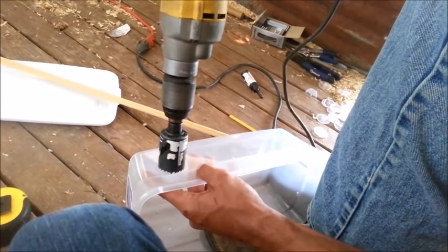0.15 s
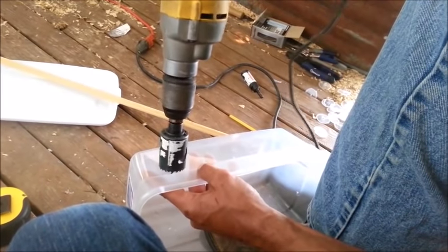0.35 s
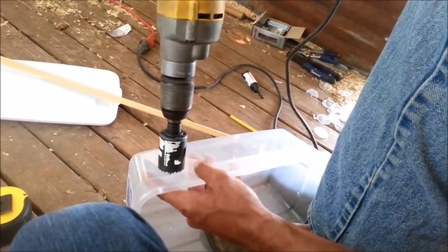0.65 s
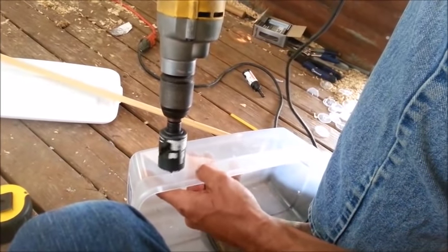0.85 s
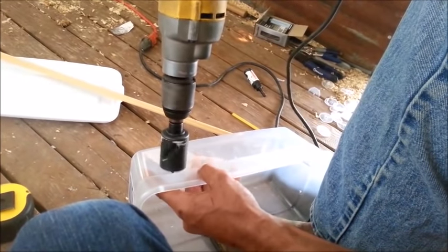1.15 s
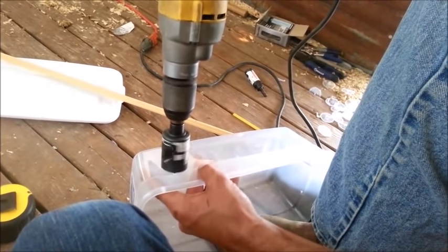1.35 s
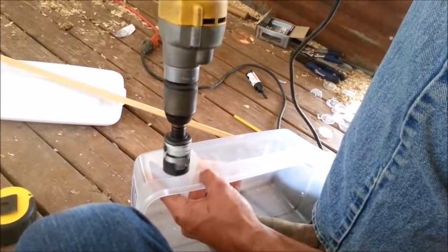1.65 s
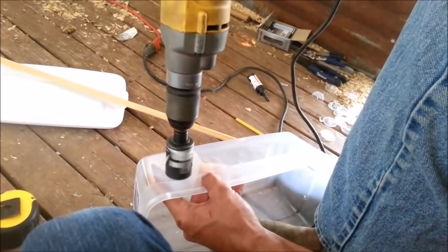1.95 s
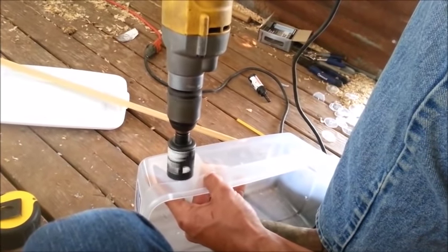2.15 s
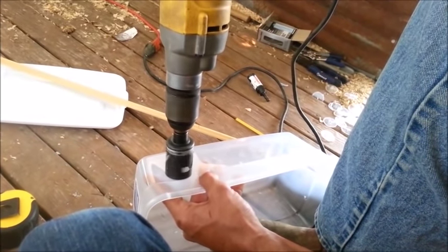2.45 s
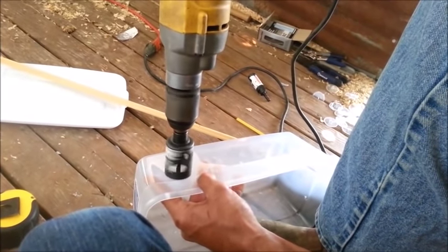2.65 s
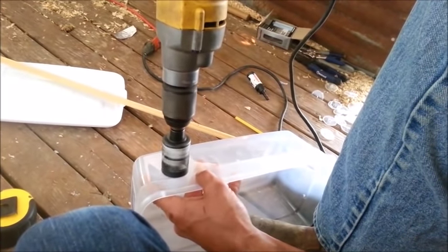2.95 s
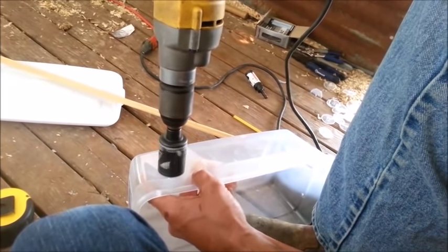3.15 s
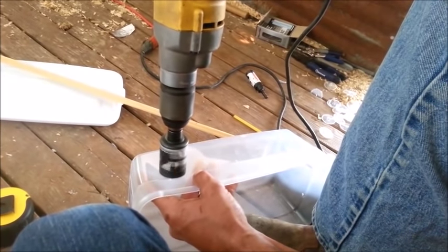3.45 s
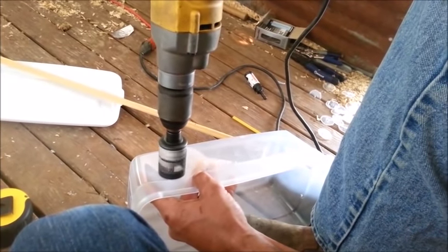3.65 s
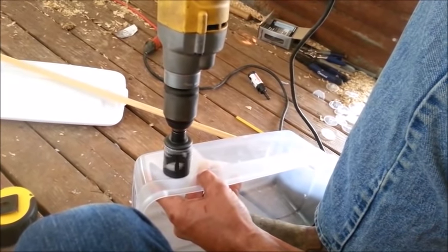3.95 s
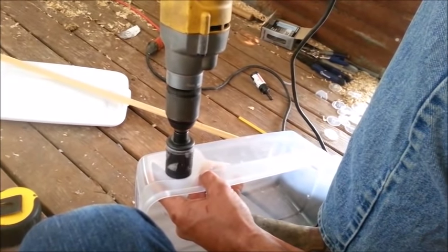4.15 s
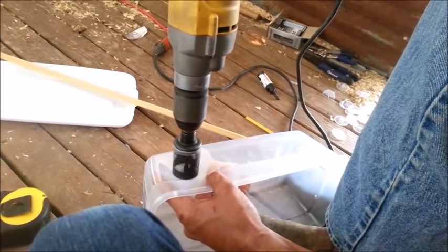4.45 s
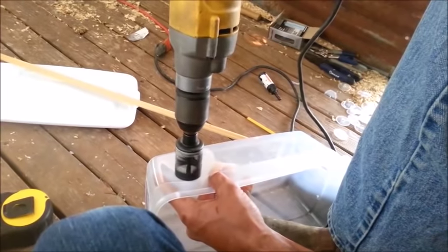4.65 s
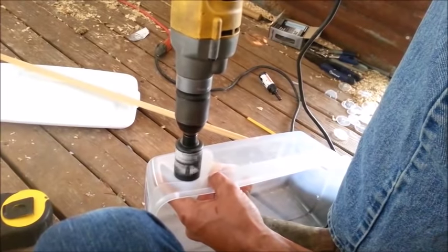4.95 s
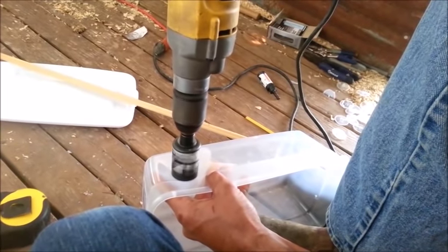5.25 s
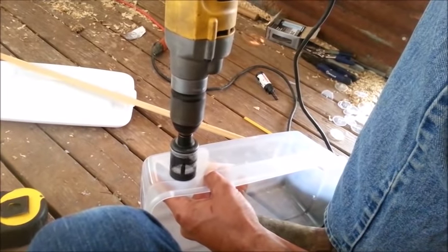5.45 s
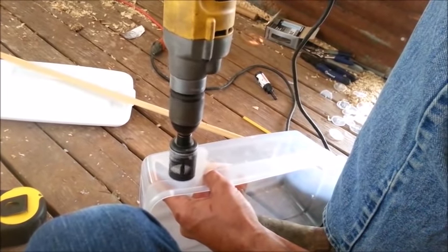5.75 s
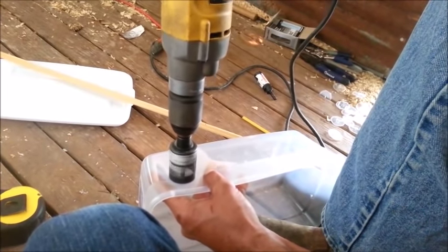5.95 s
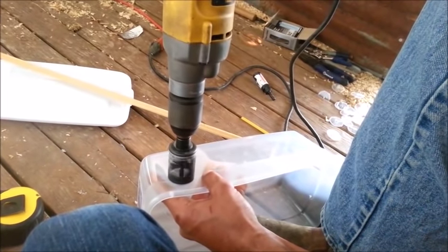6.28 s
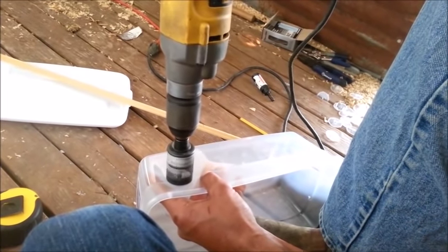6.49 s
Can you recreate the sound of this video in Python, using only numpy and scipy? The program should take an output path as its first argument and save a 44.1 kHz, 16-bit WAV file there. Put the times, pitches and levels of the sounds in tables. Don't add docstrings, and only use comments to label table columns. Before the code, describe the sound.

First a clicking, coasting gear rattle dies away. A trigger pull brings irregular knocks on a hollow plastic tub, then a coarse mains-rate buzz as the drill accelerates. Its metallic whine climbs quickly, then more slowly, with rushing fan air, ringing steel and rasping plastic. Just before the end a dull pop lets the saw spin freely. Dry, close single microphone, little bass, clipped peaks.

```python
import sys
import numpy as np
from scipy import signal
from scipy.fft import rfft, irfft, next_fast_len
from scipy.io import wavfile
from scipy.ndimage import uniform_filter1d, map_coordinates

SR = 44100
rng = np.random.default_rng(int(sys.argv[2]) if len(sys.argv) > 2 else 0)


def dump(signal):
    limited = np.clip(np.atleast_2d(signal).T, -1, 1)
    pcm = np.round(limited * 32767).astype(np.int16)
    wavfile.write(sys.argv[1], SR, pcm)


def gain_from_db(level_db):
    decades = np.asarray(level_db, float) / 20
    return 10 ** decades


N = 291942

# t/s, speed/(turns per s)
SPEED = [(.68, 45), (1.3, 76.8), (1.85, 95.6), (2.05, 108), (2.3, 135.4), (2.6, 181.3), (2.75, 201.8),
         (2.95, 222.1), (3.15, 237), (3.4, 250.7), (3.8, 267.2), (4.1, 281), (4.45, 301.3), (4.75, 311.7),
         (5.3, 326.1), (5.9, 337.6), (6.1, 336.8), (6.6, 339.8)]
# f/Hz, level/dB
SLOT_WHINE = [(1085, -55), (1650, -32), (1900, -21), (2500, -20.5), (3050, -23.5), (3300, -22.5),
              (3700, -18.5), (3930, -11.5)]
BAR_WHINE = [(3100, -40), (3650, -21), (4100, -27), (4550, -20), (5350, -31), (5850, -16.5), (7400, -20),
             (7750, -31)]
FAN_WHINE = [(3070, -73), (4980, -29), (7800, -25.5), (9800, -30.5), (11700, -35), (12300, -23),
             (12900, -36.5), (13500, -38.5)]
OVERTONE_WHINE = [(3690, -58), (4340, -38), (4660, -29), (5200, -27.5), (6000, -34), (7200, -44),
                  (9400, -52), (11200, -80)]
UNBALANCE = [(80, -84), (97, -71), (225, -53.5), (255, -44), (275, -62), (310, -47), (337, -43)]
# f/Hz, width/Hz, gain/dB
SHELL = [(2150, 350, 0), (2660, 220, 1), (2920, 200, 1), (4660, 320, 1)]
# speed/(turns per s), depth on the cutting/0-1, depth on the whines/0-1, lumpiness/dB
KICKING = [(46, 1, 0.3, 2), (83, 0.5, 0.6, .2), (99, 0.4, .6, 1), (155, 0, 0.9, 1.5), (230, 0, 0.7, 1.15),
           (272, .4, .9, .5), (304, 0.08, 1, 1.6), (325, 0, 0.41, 0.38)]
# multiple of rotor speed, level slow/dB, level fast/dB, level once through/dB
GEARING = [(2, -37, -30, -29), (2.58, -27, -42, -45), (4, -38, -26, -36), (5.16, -38, -33, -38),
           (6, -27, -31, -27), (7.16, -44, -37, -38), (7.75, -40, -30, -34), (8, -42, -36, -38),
           (8.75, -42, -35, -38), (10, -44, -38, -34), (33, -60, -53, -55), (34, -60, -54, -58),
           (36, -60, -52, -60), (37, -60, -55, -60), (38, -60, -50, -60), (41, -54, -50, -58),
           (42, -58, -56, -62)]
# f/Hz, gain/dB
HOUSING = [(340, -10), (400, -2), (590, -3), (650, -10), (760, -8), (880, -2), (1180, -1), (1250, -10),
           (1330, -4), (1700, -7), (1950, -9), (2150, 3), (2600, -10), (3300, 3)]
# f/Hz, level/dB per Hz
VENTS = [(4000, -22), (6000, 2), (7500, 3), (9000, -2.5), (10500, -9), (12000, -18), (14500, -52),
         (15000, -66)]
# t/s, rattle level/dB
EFFORT = [(0, -29.5), (.3, -33), (.65, -43), (.73, -38.5), (.77, -35), (.91, -26.5), (1.45, -24.5),
          (1.594, -26), (1.624, -20), (1.81, -22.5), (1.9, -19.5), (2.38, -17.5), (2.45, -15), (2.56, -18),
          (3.2, -19), (4.5, -17), (5.92, -16), (5.98, -14.5)]
# speed/(turns per s), tub/dB, wall/dB, hiss/dB, rasp/dB re rattle
REACH = [(46.7, 5.5, -15, -9, -6), (56.5, -6.5, -17, -4, -11), (80.5, -12, -15, 0.5, -12),
         (160, -13.5, -11, 2.5, -13), (250, -13, -1.5, 4.5, -3.5), (268, -14.5, -1.5, 3.5, -3.5),
         (316, -17, -1, 3.5, -5.5), (345, -14, -3, 2.5, -5.5)]
# tub/dB, wall/dB, hiss/dB, rasp/dB re rattle
COASTING_DB = (-9.5, -15, -9, -33)
# tub/dB, wall/dB, hiss/dB, rasp/dB
THROUGH_DB = (2, -4.5, -3, 5)
# t/s, peak level/dB, tub thump/dB, brightness/dB
KNOCKS = [(0.0258, -9, -35, -24), (0.2013, -10.5, -10, -18), (0.2765, -13.5, -1, -16.5),
          (0.298, -33, -22, -8), (0.3675, -19, -25, -32), (0.397, -12.5, -23, -33), (0.5585, -32, -16, -19),
          (0.6009, -26, -19, -31), (0.6905, -11, 10, -25.5), (0.724, -21, -1, -12), (0.7431, -8, -25, -31),
          (0.756, -7.5, 4.5, -19), (0.8559, -8, -10, -24), (0.8883, -17, -14, -18), (0.9705, -12, -1, -22),
          (1.1206, -12.5, 2, -18), (1.2041, -17, 3, -11), (1.337, -9, -51, -20), (1.4336, -8, -26, -20),
          (1.6056, -5.5, -2, -36), (1.6222, -2, -26, -26), (1.872, 3.5, -31, -24), (1.9045, -12, -32, -6),
          (2.0719, -16, -26, -32), (2.1693, -2, -28, -13), (2.2214, -11.5, -24, 0)]
# f/Hz, level/dB per Hz
TUB = [(35, -61), (60, -27), (113, -11), (150, -20), (312, 0.5), (447, 0), (471, 6), (654, -14.5),
       (750, -15), (980, -23), (1650, -120)]
WALL = [(350, -38), (600, -9), (645, -20.5), (696, -8.5), (764, -3), (878, 4), (956, 0), (1130, 0),
        (1590, -10), (1750, -7.5), (2280, -10), (3850, -120)]
GEARS = [(910, -49), (1550, -14), (1660, -22.5), (1810, -4.5), (2210, -1.5), (2330, -3.5), (2520, -8),
         (2720, -5.5), (3190, -11.5), (3500, -12), (4550, -20.5), (7700, -120)]
HISS = [(1880, -32), (3200, -8.5), (4140, -5.5), (4830, -3), (5830, -2.5), (7340, -12.5), (8080, -12.5),
        (9950, -24), (10600, -50), (10800, -101), (11500, -91), (15000, -121), (22000, -120)]
RASP = [(1500, -32), (2400, 0), (2900, 9), (4100, 7.5), (4800, 3), (5600, -22), (8000, -43)]
# f/Hz, width/Hz, gain/dB
IDLE_RING = (2310, 130, 1.6)
# t/s, peak level/dB, f/Hz, t60/s
THUD = (5.9457, 5, 420, .02)
# f/Hz, width/Hz, gain/dB
CHUCK = [(2120, 200, -14), (2399, 14, 2.5), (2800, 50, -22.5), (4770, 340, -5), (7780, 40, 0.5)]
# f/Hz, gain/dB
MIC = [(20, -28), (60, -11), (100, -4), (160, -2)]
# f/Hz, level/dB re loudness
MASK = [(40, -42), (130, -40.5), (200, -45), (300, -63), (7000, -57), (9000, -42), (10000, -46),
        (12000, -40), (15000, -44)]
# t/s, level/dB re loudness
THIN_MOMENTS = [(.21, -40), (.417, -33), (.655, -27), (1.125, -31), (1.315, -25), (1.675, -27), (2.49, -33),
                (2.55, -32), (2.815, -20), (2.87, -26), (3.195, -24), (3.47, -25), (3.77, -24), (4.58, -25),
                (6.093, -26), (6.243, -25)]

MAINS_HZ, KICK_LAG = 60.1, .42
TRIGGER_S, HUM_ENDS_S, THROUGH_S = 0.643, 4.75, THUD[0]


def rotor():
    speed, = curves(SPEED)
    turn = 2 * np.pi * np.cumsum(speed * (1 + .0007 * wobble(14))) / SR
    return whines(speed, turn) + gearing(speed, turn) + mains_hum(speed) + fan_air(speed)


def whines(speed, turn):
    through = after(THROUGH_S)
    depth = by_speed(KICKING)[1]
    jerk = -depth * np.sin(2 * np.pi * MAINS_HZ * np.arange(N) / SR)

    slots = tone(turn, 12, along(SLOT_WHINE, 12 * speed) - 3 * through, 1.3 + 2 * through, .3 * jerk)
    slots *= kicks(1.2 * depth, .055, 1.6)
    bar_db = along(BAR_WHINE, 24 * speed) - 30 * (speed < 90)
    bar_kick = np.interp(speed, [165, 185, 215, 240], [.5, 1.2, 1.2, .3])
    bars = tone(turn, 24, bar_db, 2.5, .3 * jerk) * kicks(depth * bar_kick, .06, 2.5)
    magnetic = slots + bars
    shell = gain_from_db(-10) * magnetic + sum(ring(magnetic, *mode) for mode in SHELL)

    over_db = along(OVERTONE_WHINE, 48 * speed)
    overtones = tone(turn, 48, over_db, 3, 1.5 * jerk) + tone(turn, 72, over_db - 12, 3, 1.5 * jerk)
    overtones *= kicks(.9 * depth, .11, 3)
    fan = tone(turn, 40, along(FAN_WHINE, 40 * speed), 3, .2 * jerk) * kicks(.4 * depth, .15, 2.5)
    loose_db = 15 * through
    unbalance = tone(turn, 1, along(UNBALANCE, speed) + loose_db - 1.5, 4)
    return shell + overtones + fan + unbalance


def gearing(speed, turn):
    load_db = np.interp(speed, [100, 150, 200], [-25, -5, 0])
    fast, through = np.interp(speed, [172, 200], [0, 1]), after(THROUGH_S)
    total = np.zeros(N)
    for multiple, slow_db, fast_db, free_db in GEARING:
        level_db = slow_db + fast * (fast_db - slow_db) + through * (free_db - fast_db) + load_db
        if multiple < 20:
            level_db = level_db + along(HOUSING, multiple * speed)
        total += tone(turn, multiple, level_db, 2.4)
    return total


def mains_hum(speed):
    level_db = -47.5 - 55 * after(HUM_ENDS_S) + 2.2 * wobble(24)
    level_db += np.interp(speed, [230, 275], [0.3, 4]) * wobble(31)
    return np.sqrt(2) * gain_from_db(level_db) * np.sin(2 * np.pi * 120.03 * np.arange(N) / SR)


def fan_air(speed):
    level_db = np.interp(speed, [80, 130, 201, 276, 340], [-73.5, -40.5, -30.5, -25, -23])
    return gain_from_db(level_db + 0.84 * wobble(13)) * coloured(rng.standard_normal(N), VENTS)


def cutting():
    gear_db, = curves(EFFORT)
    on, through = after(TRIGGER_S), after(THROUGH_S)
    tub_db, wall_db, hiss_db, rasp_db = (
        gear_db + on * reach + (1 - on) * idle + through * free
        for reach, idle, free in zip(by_speed(REACH), COASTING_DB, THROUGH_DB))
    depth, _, lumpy_db = on * by_speed(KICKING)
    lumpy_db = lumpy_db + (1 - on) * 4 * np.arange(N) / SR
    shared = 1.08 * wobble(30) + 0.57 * wobble(120)

    def shake(kick_share, fall, lump_share):
        lump_db = lump_share * lumpy_db
        lumps = gain_from_db(lump_db * (shared + 1.15 * wobble(200)) - 0.04 * lump_db ** 2)
        return rng.standard_normal(N) * kicks(kick_share * depth, fall, 0.54) * lumps

    tub = gain_from_db(tub_db) * shake(np.interp(tub_db, [-38, -30], [1.4, .3]), 0.079, 0.97)
    wall = gain_from_db(wall_db) * shake(0.14, 0.054, 0.68)
    gear = gain_from_db(gear_db - 2.5) * shake(0.24, 0.13, 0.86)
    hiss = gain_from_db(hiss_db - 4.5) * shake(0.25, 0.27, 0.24)
    add_knocks(tub, wall, gear, hiss)

    from_tear = np.arange(N) / SR - THROUGH_S
    tear_db = 7 * (np.arange(N) > THROUGH_S * SR) * gain_from_db(-60 * abs(from_tear) / .2)
    rasp = gain_from_db(rasp_db + tear_db + .9 * wobble(14)) * shake(.5, .15, 1.3)

    rattle = coloured(gear, GEARS)
    rattle = rattle + (1 - on) * ring(rattle, *IDLE_RING)
    return coloured(tub, TUB) + coloured(wall, WALL) + rattle + coloured(hiss, HISS) + coloured(rasp, RASP)


def add_knocks(tub, wall, gear, hiss):
    t = np.arange(1400) / SR
    for s, db, thump_db, bright_db in KNOCKS:
        burst = gain_from_db(db - 60 * t / 0.034) * rng.standard_normal((3, len(t)))
        start = round(s * SR)
        span = slice(start, start + len(t))
        tub[span] += gain_from_db(thump_db - 20.0) * burst[0]
        wall[span] += gain_from_db(bright_db - 8) * burst[0]
        gear[span] += gain_from_db(-14) * burst[1]
        hiss[span] += gain_from_db(bright_db) * burst[2]


def chuck(vibration):
    return sum(ring(vibration, hz, width_hz, db + 2.0 * wobble(25)) for hz, width_hz, db in CHUCK)


def thud():
    s, db, hz, t60 = THUD
    t = np.maximum(np.arange(N) / SR - s, 0)
    onset = 1 - np.exp(-t / .0012)
    return -gain_from_db(db - 60 * t / t60) * np.sin(2 * np.pi * hz * t) * onset


def room_air():
    spectrum = [(30, -31), (90, -6), (300, 2), (3000, -10), (14000, -14), (15000, -70)]  # f/Hz, level/dB
    return gain_from_db(-49.5) * coloured(rng.standard_normal(N), spectrum)


def tone(turn, multiple, db, flutter_db, pull=0):
    phase = multiple * turn + .22 * wobble(70) + pull
    return np.sqrt(2) * gain_from_db(db + flutter_db * wobble(45)) * np.sin(phase)


def kicks(depth, fall, scatter_db):
    cycle = np.arange(N) / SR * MAINS_HZ - KICK_LAG + 1
    u = cycle % 1 / fall
    strength = gain_from_db(scatter_db * rng.standard_normal(int(cycle[-1]) + 1))[cycle.astype(int)]
    depth = np.clip(depth, 0, 1)
    return np.sqrt(1 - depth + depth * unit(strength * u * np.exp(-u)) ** 2)


def ring(x, hz, width_hz, db):
    return gain_from_db(db) * signal.lfilter(*signal.iirpeak(hz, hz / width_hz, SR), x)


def coloured(x, spectrum):
    m = 2 * next_fast_len(N // 2 + 4096)
    gain = gain_from_db(np.maximum(along(spectrum, np.fft.rfftfreq(m, 1 / SR)), -70))
    cepstrum = irfft(np.log(gain), m)
    cepstrum[1:m // 2] *= 2
    cepstrum[m // 2 + 1:] = 0
    response = np.exp(rfft(cepstrum)) / np.sqrt(np.mean(gain ** 2))
    return irfft(rfft(x, m) * response, m)[:N]


def wobble(rate):
    coarse = np.arange(0, N + 16, 16)
    knots = rng.standard_normal(int(N * rate / SR) + 4)
    return np.interp(np.arange(N), coarse, map_coordinates(knots, [coarse * rate / SR]))


def after(s):
    return np.clip((np.arange(N) / SR - s) / 0.041, 0, 1)


def curves(rows):
    s, *columns = np.transpose(rows)
    return [np.interp(np.arange(N) / SR, s, c) for c in columns]


def by_speed(rows):
    speeds, *columns = np.transpose(rows)
    speed, = curves(SPEED)
    return [np.interp(speed, speeds, c) for c in columns]


def along(points, hz):
    f, v = np.transpose(points)
    return np.interp(np.log(hz + 1), np.log(f + 1), v)


def unit(x):
    return x / np.sqrt(np.mean(x ** 2) + 1e-20)


def scene():
    drill = rotor() + cutting()
    return np.tile(drill + chuck(drill) + thud() + room_air(), (2, 1))


def lose_faint_bands(x):
    hz, t, z = signal.stft(x, SR, nperseg=1024)
    power = abs(z) ** 2 + 1e-16
    loud_db = 1.16 * (10 * np.log10(power.sum(0)) + 14) - 14
    thin_db = np.max([db - 30 * ((t - s) / .026) ** 2 for s, db in THIN_MOMENTS], axis=0)
    hz = hz[:, None]
    mask_db = loud_db + np.maximum(along(MASK, hz), thin_db - 20 * (hz < 1100))
    scatter = np.repeat(rng.standard_normal((len(hz) // 6 + 1, len(t))), 6, axis=0)[:len(hz)]
    mask_db += 3.5 * (hz > 250) * scatter
    band_db = 10 * np.log10(uniform_filter1d(power, size=3, axis=0) + 1e-16)
    keep = 1 / (1 + np.exp(np.clip(mask_db - band_db, -30, 30) / .5))
    return signal.istft(z * keep, SR, nperseg=1024)[1][:N]


def top_cut(x):
    return signal.sosfilt(signal.butter(12, 14470, fs=SR, output="sos"), x)


def record(dry):
    clipped = np.clip(coloured(dry[0], MIC), -.97, .97)
    mix = np.tile(lose_faint_bands(clipped), (2, 1))
    return top_cut(mix)


dry = scene()
out = record(dry)
dump(out)
```